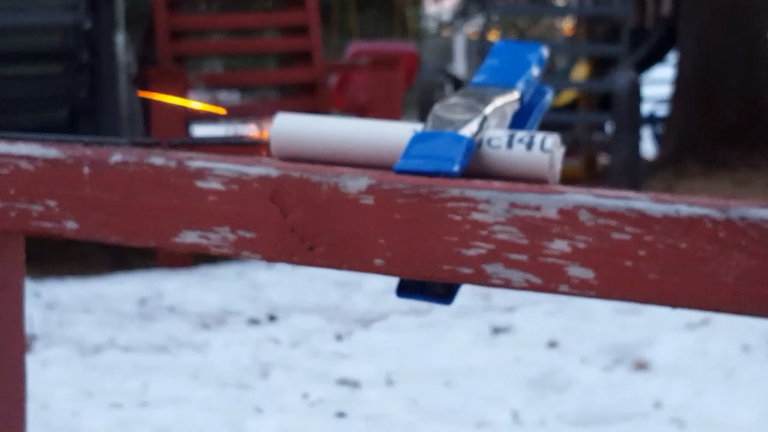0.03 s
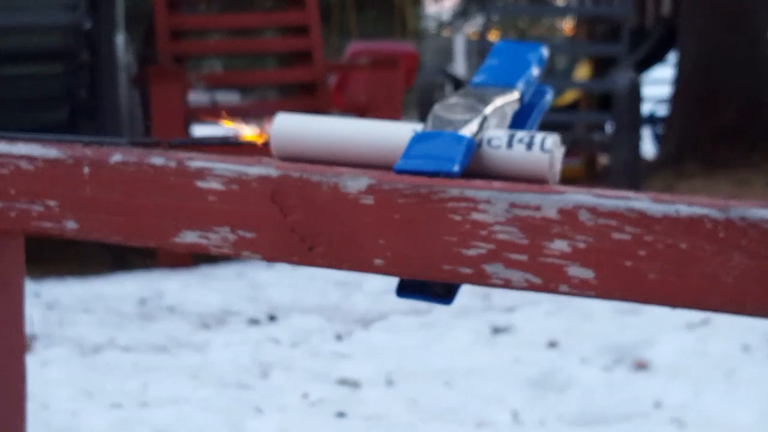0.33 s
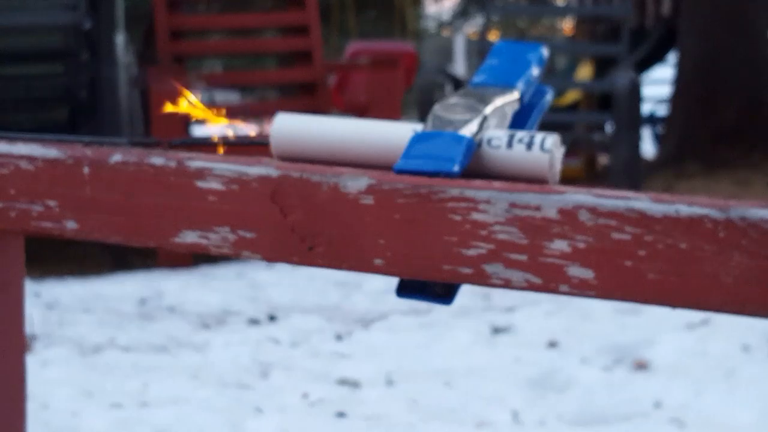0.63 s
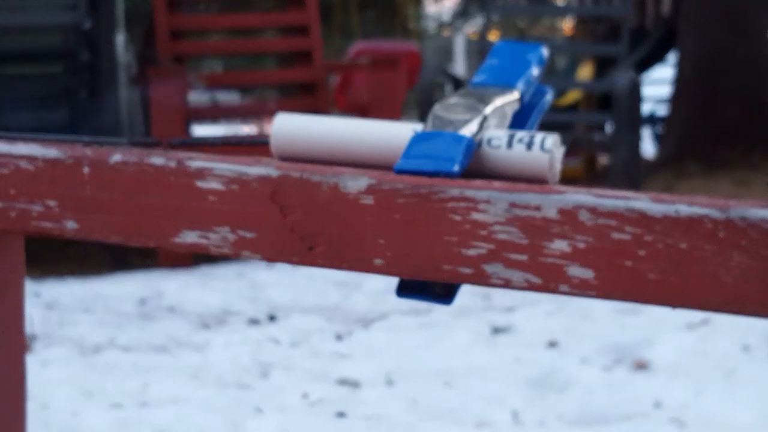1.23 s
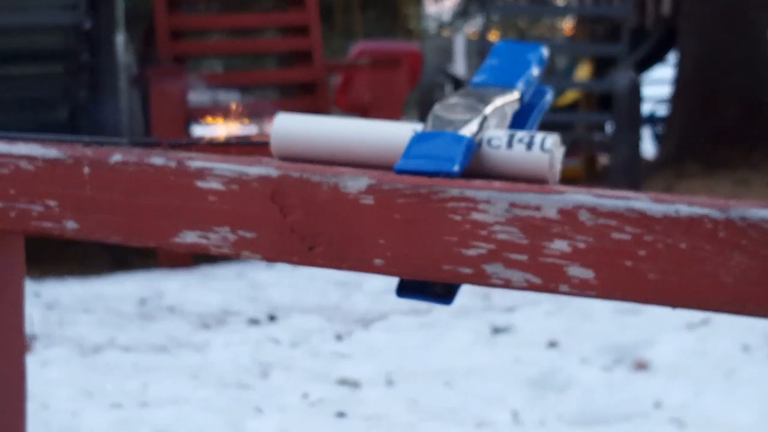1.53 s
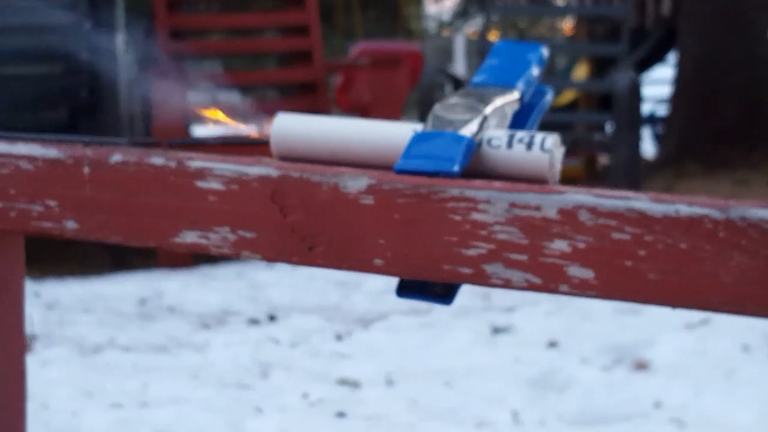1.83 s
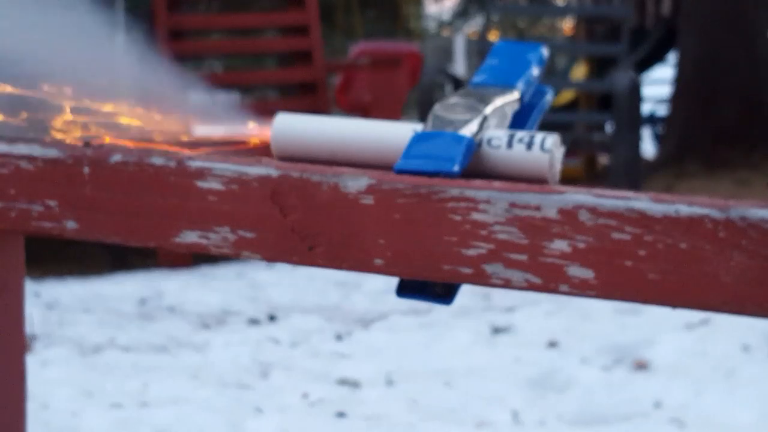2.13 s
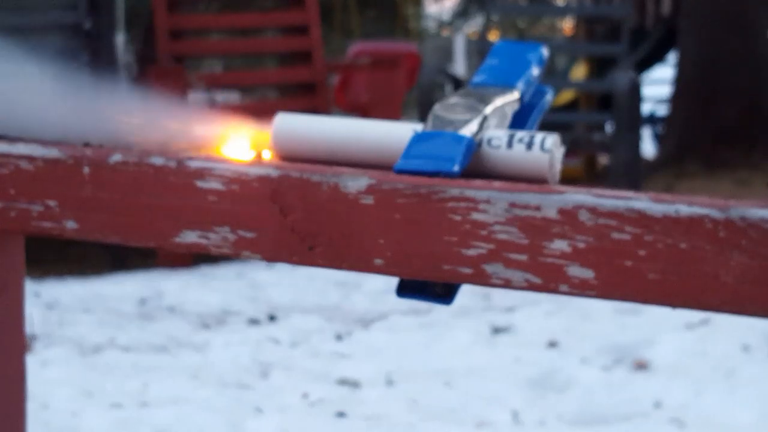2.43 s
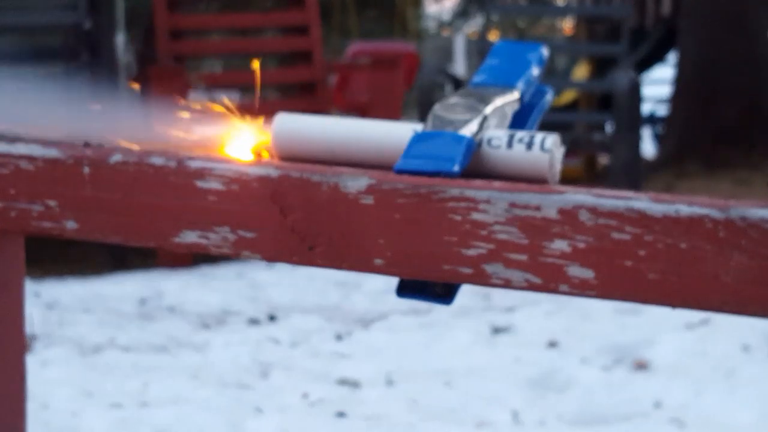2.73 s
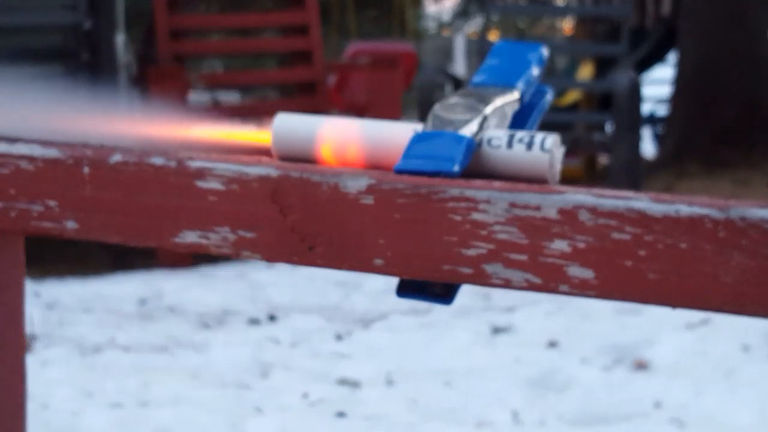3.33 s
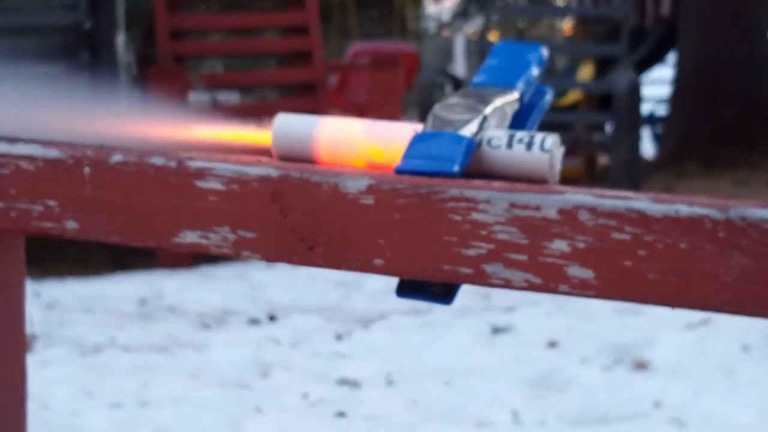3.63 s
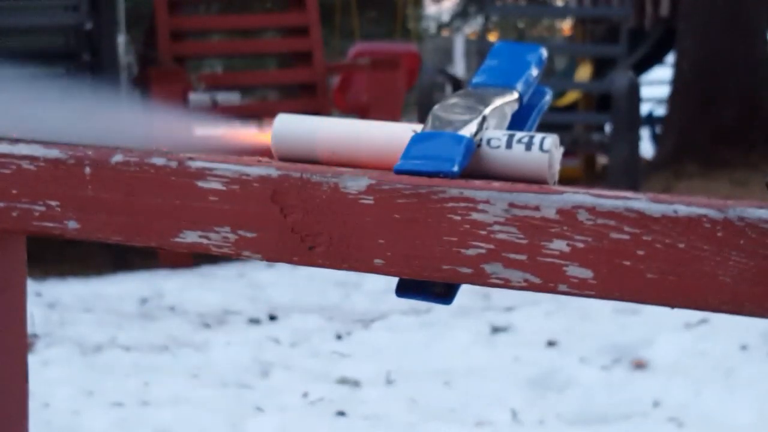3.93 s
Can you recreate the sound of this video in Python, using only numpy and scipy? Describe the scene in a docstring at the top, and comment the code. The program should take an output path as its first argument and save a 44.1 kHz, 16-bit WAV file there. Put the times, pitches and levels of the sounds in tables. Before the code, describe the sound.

A small rocket motor fizzes at the fuse, then builds to a hissing roar outdoors.

```python
"""Outdoors in the snow: a small homemade rocket motor burns, clamped to a wooden rail.
The fuse fizzes unevenly and the propellant catches. A narrow turbulent hiss swells at the nozzle,
then opens into the wide, even roar of the plume. Uneven burning makes the jet chuff, hardest near
burnout; it then drops to a soft rush. Behind it: a distant rumble and a few puffs of wind."""
import sys
import numpy as np
from scipy import signal
from scipy.fft import rfft, irfft
from scipy.io import wavfile

SR = 44100
rng = np.random.default_rng(int(sys.argv[2]) if len(sys.argv) > 2 else 0)


def persist_wave(psi):
    """Save psi, clipped to +-1, as 16-bit WAV."""
    counts = np.round(np.clip(psi, -1, 1) * 32767).astype(np.int16)
    wavfile.write(sys.argv[1], SR, np.atleast_2d(counts).T)


N = 176400
TIME_S = np.arange(N) / SR
BINS_HZ = np.maximum(np.arange(N // 2 + 1) * SR / N, 1)

# Distant rumble: freq_hz, gain_db
RUMBLE_SPECTRUM = [(20, -29), (45, -11), (70, -2.5), (110, 0), (200, -7.5), (320, -13), (900, -14),
                   (1500, -22.5), (3000, -31), (14000, -36.5)]
# Rumble, left against right: freq_hz, correlation
RUMBLE_CORRELATION = [(150, 0.93), (550, 0.51), (1600, 0.05)]
# Wind on the microphone: freq_hz, gain_db
WIND_SPECTRUM = [(20, -16), (50, -4), (90, 3.5), (170, -14), (400, -35), (2000, -70)]
# Wind puffs: peak_s, level_db, sigma_s
WIND_PUFFS = [(1.567, -48, .016), (1.64, -44.5, 0.018), (3.25, -41, 0.0097), (3.545, -39.5, 0.028)]

# Fuse fizz: freq_hz, gain_db
FIZZ_SPECTRUM = [(60, -30), (700, -8), (1400, -14), (1850, 0), (2300, -3.5), (2750, -3.5), (3150, 2.5),
                 (3700, -3), (4500, -2), (5300, 1), (6000, -2.5), (6400, 0), (7600, -1.5), (8300, -6.5),
                 (9300, -1), (10500, -10.5), (11600, -5.5), (13100, -4.5), (14400, -11)]
# Fizz envelope: time_s, relative_db
FIZZ_ENVELOPE = [(0.0, -60), (0.164, -66.5), (0.284, -65), (0.64, -68), (0.676, -63.5), (0.756, -65.5),
                 (0.832, -62.5), (0.876, -68.5), (0.912, -62), (0.956, -66.5), (1.118, -68.5),
                 (1.272, -62.5), (1.362, -68.5), (1.388, -57.5), (1.494, -62.5), (1.514, -66.5),
                 (1.614, -57.5), (1.8, -63)]
# Fuse spits: peak_s, boost_db, sigma_s
FUSE_SPITS = [(.35, 3.5, 0.0065), (.825, 2, 0.0092), (1.037, 3, 0.0066), (1.172, 4, 0.0096),
              (1.476, 4.5, 0.0092), (1.71, 1, 0.0091)]
# Spark pop: start_s, level_db
FUSE_SPARKS = [(1.5334, -44.5)]

# Chuffs of the burning grain: peak_s, level_db, sigma_s, pitch_hz
GRAIN_CHUFFS = [(2.943, -29.5, 0.012, 364.7), (3.012, -26, 0.026, 310), (3.119, -22.5, 0.018, 300),
                (3.796, -15.5, 0.0082, 360.7), (3.855, -22.5, 0.016, 335.2), (3.972, -41, 0.012, 390)]
# Nozzle resonance: time_s, centre_hz, level_db
NOZZLE_RESONANCE = [(1.8, 3130, -65), (1.92, 3150, -54), (2.08, 3188, -42.5), (2.45, 3420, -29),
                    (2.74, 3650, -22), (3.0, 3724, -31.5), (3.42, 3357, -22), (3.78, 3150, -30),
                    (3.9, 3150, -46)]
# Hiss at the nozzle: freq_hz, gain_db
HISS_SPECTRUM = [(40, -38), (250, -8.5), (700, -10.5), (1200, -19.5), (1450, -27.5), (1850, -12.5),
                 (2300, -8), (2700, -7), (3150, -3.5), (3600, -5), (4000, -9.5), (4550, -8.5), (5400, -7.5),
                 (6300, -6), (7000, -10), (7700, -8.5), (8400, -10), (9300, -6.5), (10200, -13),
                 (11500, -11.5), (13200, -7), (14400, -19.5)]
# Exhaust hiss envelope: time_s, relative_db
HISS_ENVELOPE = [(1.82, -56.5), (2.06, -42.5), (2.49, -34), (2.77, -24), (3.3, -18.5), (3.76, -21),
                 (3.82, -24), (3.88, -40), (4.0, -38.5)]
# Roaring plume: freq_hz, gain_db
PLUME_SPECTRUM = [(30, -54), (70, -25.5), (150, -13.5), (230, -9), (380, 0), (500, -3), (700, -2),
                  (1000, -3.5), (1300, -0.5), (1480, -4.5), (1680, -1), (1850, 2.5), (2150, -2.5),
                  (2450, -1.5), (2680, -8.5), (2900, -3.5), (3120, -1), (3350, -6), (3650, -2), (4200, -7),
                  (4550, -8), (5100, -12.5), (6300, -8.5), (7200, -11.5), (8600, -10.5), (9300, -10.5),
                  (10200, -14), (11400, -11.5), (13000, -6.5), (14400, -15.5)]
# Exhaust roar envelope: time_s, relative_db
ROAR_ENVELOPE = [(1.82, -73), (2.1, -50.5), (2.42, -35), (3.04, -24), (3.28, -24), (3.29, -22), (3.69, -23),
                 (3.79, -20.5), (3.88, -33.5), (3.89, -42), (3.95, -40.5), (3.97, -41.5), (4.0, -44.5)]
# Narrow jet's roar against the plume's: freq_hz, gain_db
NARROW_ROAR_TILT = [(60, -9), (150, -2), (220, 1.5), (300, -2), (700, -4.5), (1400, 1.5), (2000, 1.5),
                    (2700, 2.5), (3300, -2), (4200, -1)]

# Nozzle, left over right: freq_hz, balance_db
NOZZLE_BALANCE = [(500, -1.5), (900, 0), (1200, 5.5), (1500, 2), (1830, 2.5), (2200, -1.5), (2680, -4),
                  (3100, 1.5), (3900, -2), (4400, -2), (5000, -7), (5900, -15), (6400, 2), (7050, -10),
                  (7700, -7), (8400, 0.5), (8900, -10), (9400, -32), (10500, -12), (11200, -22),
                  (12100, -9), (14400, -15)]
# Nozzle, left against right: freq_hz, correlation
NOZZLE_CORRELATION = [(400, 0.89), (3800, 0.87), (4600, 0.72), (6300, 0.88), (7100, 0.46), (7600, .72),
                      (8600, 0.68), (9400, .2), (11000, .3), (12200, .62), (14400, .35)]
# Nozzle, left behind right: freq_hz, lag_rad
NOZZLE_LAG = [(1200, 0.5), (1450, 1.73), (1680, 0.3), (2100, 1.75), (2350, 0.23), (2620, 1.9), (2800, 1),
              (3000, 0.45), (3250, 1), (3850, 1.6), (4200, 0.66), (4650, 2.5), (5300, 1), (6100, 1),
              (6850, 2.4), (7300, .7), (8600, 3), (11700, 1), (14000, 3.5)]
# Plume, left over right: freq_hz, balance_db
PLUME_BALANCE = [(300, -1), (1200, 1), (1800, 1.5), (2600, -2), (3200, 0.5), (4600, -1), (5300, -2),
                 (6400, -1.5), (7200, 1), (8000, -6), (8800, -1.5), (9400, -25), (10600, -7), (11400, -14),
                 (12000, -5), (14400, -11.5)]
# Plume, left against right: freq_hz, correlation
PLUME_CORRELATION = [(400, 0.72), (1400, 0.6), (1850, 0.55), (4000, 1), (4600, .2), (5800, 0.38),
                     (8600, 0.32), (9500, 0.09), (12500, .3)]
# Plume, left behind right: freq_hz, lag_rad
PLUME_LAG = [(1100, -0.8), (1450, 1.8), (1680, 0.22), (2100, 1.27), (2850, 0.46), (3600, 1.5), (4200, 1),
             (5000, 2), (6000, -0.5), (6800, 1.5), (7500, 0.4), (8600, 3.5), (12000, 0.8)]


def from_db(db):
    """Decibels to gain."""
    return 10 ** (np.asarray(db) / 20)


def unit_rms(x):
    """Scale to rms 1."""
    return x / np.sqrt(np.mean(x ** 2) + 1e-20)


def per_sample(table):
    """Value columns of a time table at every sample."""
    time_s, *columns = np.transpose(table)
    return [np.interp(TIME_S, time_s, column) for column in columns]


def per_bin(table):
    """Frequency table at every bin, on a log axis."""
    freq_hz, values = np.transpose(table)
    return np.interp(np.log(BINS_HZ), np.log(freq_hz), values)


def drift(corner_hz):
    """Low-passed random fluctuation, rms 1."""
    return unit_rms(irfft(rfft(rng.standard_normal(N)) / (1 + (BINS_HZ / corner_hz) ** 2), N))


def swell(peak_s, sigma_s):
    """Gaussian envelope."""
    return np.exp(-.5 * ((TIME_S - peak_s) / sigma_s) ** 2)


def stereo_noise(gain, correlation=0, balance_db=0, lag_rad=0):
    """Steady noise of given spectrum and stereo image, rms 1."""
    mid, side = rfft(rng.standard_normal((2, N)))
    mid, side = mid * np.sqrt(1 + correlation), side * np.sqrt(1 - correlation)
    ratio = from_db(balance_db)
    pair = np.array([(mid + side) * ratio * np.exp(-1j * lag_rad), mid - side])
    return unit_rms(irfft(pair * gain / np.sqrt(1 + ratio ** 2), N))


def resonant_noise(centre_hz, half_width_hz):
    """Steep-sided noise band, rms 1; the centre may move."""
    phase = 2 * np.pi * np.cumsum(centre_hz * np.ones(N)) / SR
    rolloff = 1 + (BINS_HZ / half_width_hz) ** 4
    in_phase, quadrature = irfft(rfft(rng.standard_normal((2, N))) / rolloff, N)
    return unit_rms(in_phase * np.cos(phase) + quadrature * np.sin(phase))


def nozzle_noise(gain):
    """Turbulence from a small spot at the nozzle."""
    return stereo_noise(gain, per_bin(NOZZLE_CORRELATION), per_bin(NOZZLE_BALANCE), per_bin(NOZZLE_LAG))


def plume_noise(gain):
    """Turbulence spread along the plume."""
    return stereo_noise(gain, per_bin(PLUME_CORRELATION), per_bin(PLUME_BALANCE), per_bin(PLUME_LAG))


def at_nozzle(mono):
    """Place a mono sound at the nozzle."""
    ratio = from_db(per_bin(NOZZLE_BALANCE))
    pan = np.array([ratio * np.exp(-1j * per_bin(NOZZLE_LAG)), np.ones_like(ratio)])
    return irfft(rfft(mono) * pan * np.sqrt(2 / (1 + ratio ** 2)), N)


def rumble():
    """Steady distant rumble, near mono in the bass."""
    return from_db(-57.5) * stereo_noise(from_db(per_bin(RUMBLE_SPECTRUM)), per_bin(RUMBLE_CORRELATION))


def wind():
    """Short, low puffs brush the microphone."""
    puffs = sum(from_db(db) * swell(peak_s, sigma_s) for peak_s, db, sigma_s in WIND_PUFFS)
    return puffs * stereo_noise(from_db(per_bin(WIND_SPECTRUM)))


def fuse(gain_db=7.5, sputter_db=1.5, spark_decay_s=0.0024):
    """The fuse fizzes with a fine sputter, spits now and then and throws one spark."""
    spits_db = sum(db * swell(peak_s, sigma_s) for peak_s, db, sigma_s in FUSE_SPITS)
    level_db = gain_db + per_sample(FIZZ_ENVELOPE)[0] + spits_db
    fizz = nozzle_noise(from_db(per_bin(FIZZ_SPECTRUM)))
    sputter = from_db(sputter_db * drift(corner_hz=150))
    pop = sum(from_db(db) * (TIME_S >= start_s) * np.exp(-np.abs(TIME_S - start_s) / spark_decay_s)
              for start_s, db in FUSE_SPARKS)
    spark = pop * resonant_noise(centre_hz=1830, half_width_hz=750 * 2)
    return from_db(level_db) * unit_rms(fizz * sputter) + at_nozzle(spark)


def chuffs():
    """Uneven burning makes the flow throb for a few low, wavering cycles, with a rough puff of gas."""
    waver_hz = 55 * drift(corner_hz=110)
    gas = from_db(-7) * resonant_noise(centre_hz=380, half_width_hz=85)
    pulses = np.zeros(N)
    for peak_s, level_db, sigma_s, pitch_hz in GRAIN_CHUFFS:
        throb = np.sqrt(2) * np.sin(2 * np.pi * np.cumsum(pitch_hz + waver_hz) / SR)
        pulses += from_db(level_db) * swell(peak_s, sigma_s) * (throb + gas)
    return at_nozzle(pulses)


def nozzle():
    """Gas excites a broad resonance that climbs as pressure builds, then sinks."""
    centre_hz, level_db = per_sample(NOZZLE_RESONANCE)
    return at_nozzle(from_db(level_db) * resonant_noise(centre_hz, half_width_hz=500))


def jet(split_hz=4480, opens_s=3.004, crossfade_s=0.3, surge_db=0.86):
    """Hiss and roar swell as a narrow jet, then open into a wide plume; the flow surges slightly."""
    hiss_db = per_sample(HISS_ENVELOPE)[0]
    roar_db = per_sample(ROAR_ENVELOPE)[0]
    low_share = 1 / (1 + (BINS_HZ / split_hz) ** 16)
    body, treble = from_db(per_bin(PLUME_SPECTRUM)) * np.sqrt([low_share, 1 - low_share])
    narrow_hiss = from_db(hiss_db + 4.5) * nozzle_noise(from_db(per_bin(HISS_SPECTRUM)))
    narrow_roar = from_db(roar_db + 8) * nozzle_noise(body * from_db(per_bin(NARROW_ROAR_TILT)))
    wide_hiss = from_db(hiss_db + 4) * plume_noise(treble)
    wide_roar = from_db(roar_db + 7.5) * plume_noise(body)
    opened = np.clip(.5 + (TIME_S - opens_s) / crossfade_s, 0, 1)
    flow = np.sqrt(1 - opened) * (narrow_hiss + narrow_roar) + np.sqrt(opened) * (wide_hiss + wide_roar)
    return flow * from_db(surge_db * drift(corner_hz=33))


def scene(ignition_s=1.79, crossfade_s=0.15):
    """The fuse hands over to the motor at ignition, over rumble and wind."""
    lit = np.clip(.5 + (TIME_S - ignition_s) / crossfade_s, 0, 1)
    rocket = np.sqrt(1 - lit) * fuse() + np.sqrt(lit) * (jet() + nozzle()) + chuffs()
    return rocket + rumble() + wind()


def record(dry, low_cut_hz=35, high_cut_hz=14550):
    """Low cut, clip at full scale, steep high cut."""
    low_cut = signal.butter(2, low_cut_hz, "high", fs=SR, output="sos")
    high_cut = signal.cheby1(16, .1, high_cut_hz, fs=SR, output="sos")
    clipped = np.clip(signal.sosfilt(low_cut, dry), -1, 1)
    return signal.sosfilt(high_cut, clipped)


dry = scene()
out = record(dry)
persist_wave(out)
```